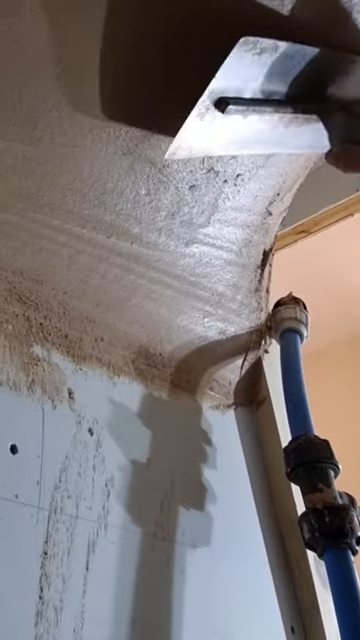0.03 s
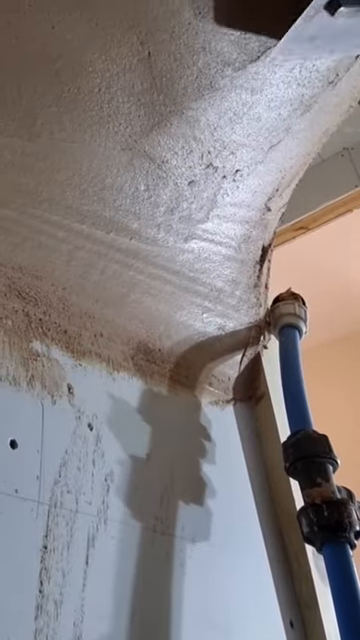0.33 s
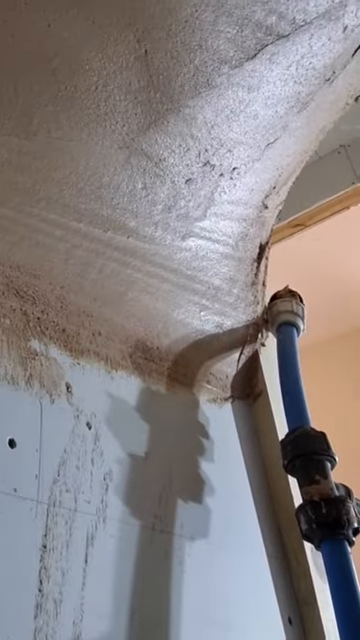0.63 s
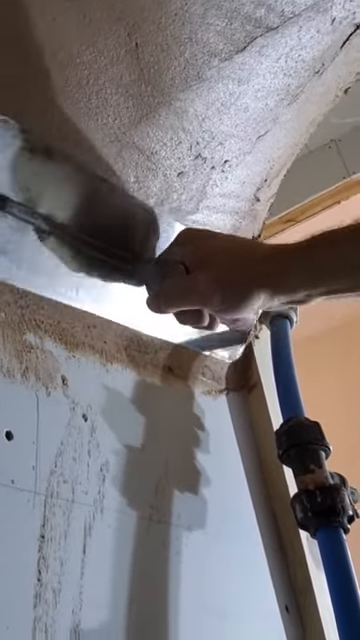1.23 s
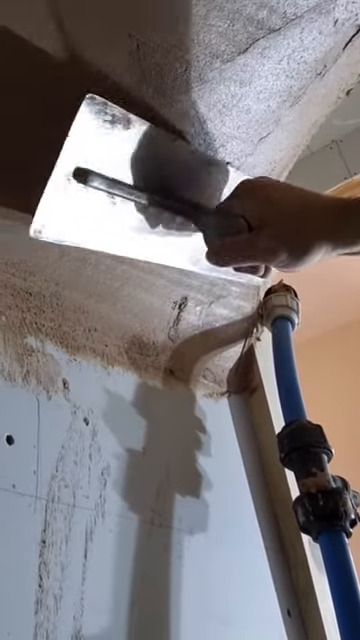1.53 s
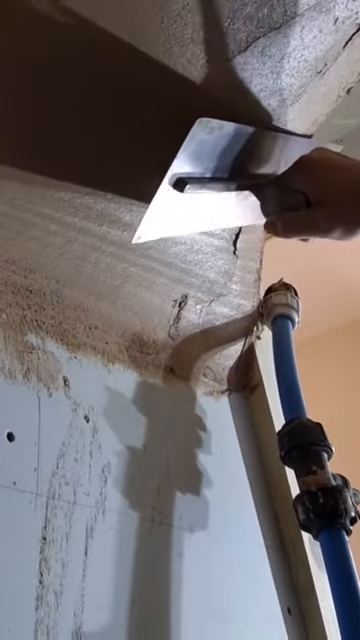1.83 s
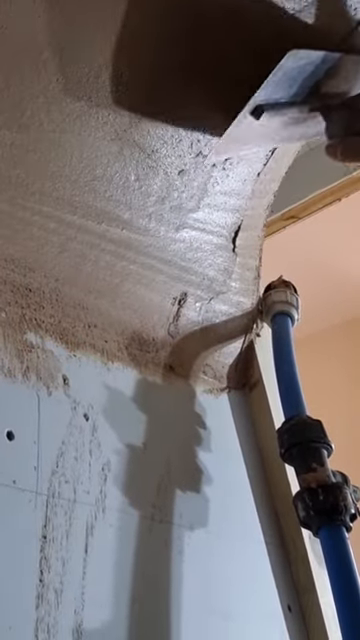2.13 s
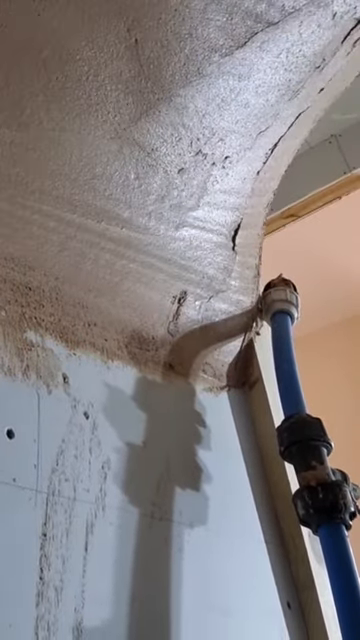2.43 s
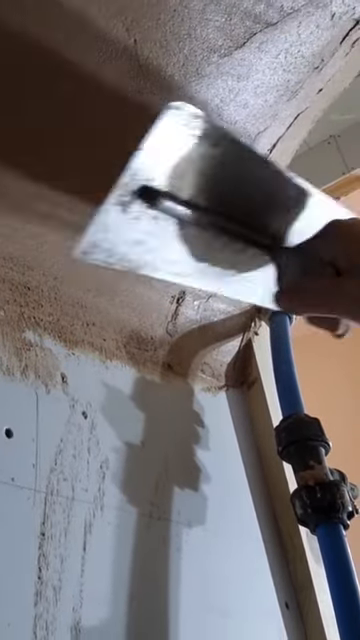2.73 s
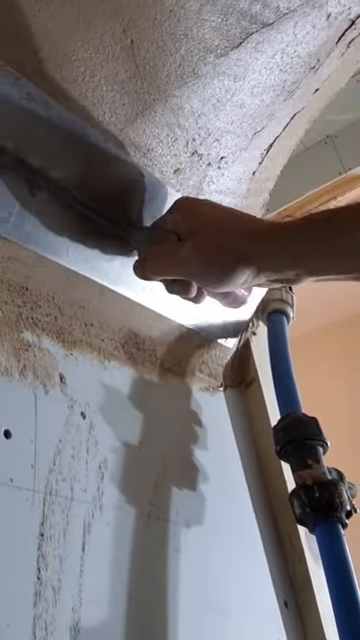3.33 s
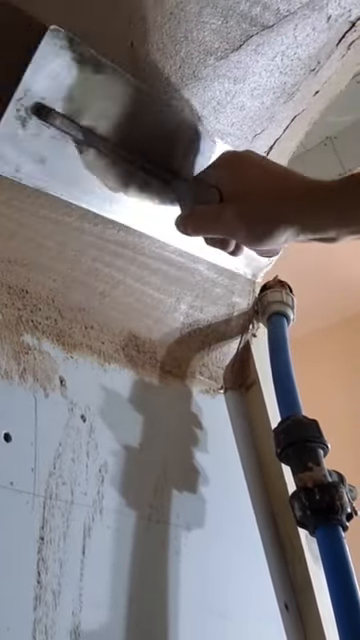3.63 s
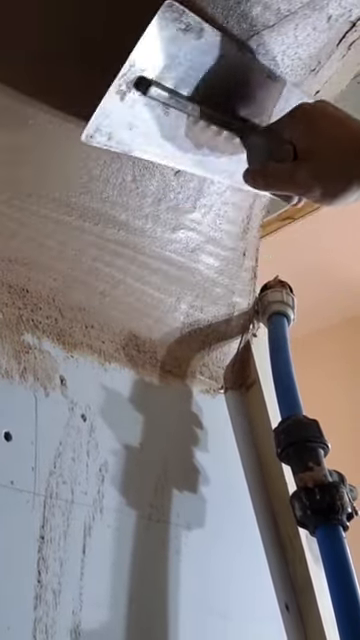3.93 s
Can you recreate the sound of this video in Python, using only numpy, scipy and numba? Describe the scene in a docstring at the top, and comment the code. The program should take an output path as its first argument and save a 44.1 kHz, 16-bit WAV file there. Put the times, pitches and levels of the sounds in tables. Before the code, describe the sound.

A trowel smooths wet plaster close by, with gritty hissing strokes and soft wall thumps.

```python
"""Smoothing plaster with a trowel

A steel trowel works wet plaster, close by in a small bare room. The blade lands with a pat and a soft
thump of the wall board, squashes the plaster, hisses over its sand and flicks off at the stroke's top.
Of three strokes, the first is already under way. Before the last, something like a wet lump slaps down."""
import sys
import numpy as np
from scipy import signal
from scipy.fft import rfft, irfft
from scipy.io import wavfile
from scipy.ndimage import uniform_filter1d
from numba import njit

SR = 44100
rng = np.random.default_rng(int(sys.argv[2]) if len(sys.argv) > 2 else 0)


def to_wav(s):
    """Save 16-bit WAV."""
    ch = np.atleast_2d(s).T  # columns
    pcm = np.round(np.clip(ch, -1, 1) * 32767)  # PCM
    wavfile.write(sys.argv[1], SR, pcm.astype(np.int16))


N = 176400

# How loudly each stroke scrapes: time_s, level_db
FIRST_STROKE = [(0, -61.5), (.06, -58), (.25, -63), (.33, -55.5), (.42, -61), (.5, -57), (.58, -65.5),
                (.597, -103), (.64, -99)]
SECOND_STROKE = [(1.2, -89), (1.233, -56), (1.243, -49), (1.29, -54), (1.34, -52), (1.41, -60), (1.47, -60),
                 (1.55, -58), (1.64, -62.5), (1.76, -63), (1.88, -65), (2.05, -63.5), (2.17, -58.5),
                 (2.36, -56.5), (2.43, -60), (2.5, -58), (2.545, -58.5), (2.585, -102)]
THIRD_STROKE = [(3.15, -79), (3.19, -58), (3.235, -51.5), (3.3, -58.5), (3.42, -59.5), (3.52, -63.5),
                (3.63, -56.5), (3.72, -60), (3.84, -65), (3.94, -60.5), (4, -65.5)]
# How the blade is held: time_s, tilt (0 is flat, 1 is on its edge)
BLADE_TILT = [(0, 0.98), (.58, 0.86), (1.2, 0.074), (1.6, 0.16), (2.0, 0.49), (2.2, 0.91), (2.55, 1),
              (3.15, 0.041), (4, 0.16)]
# Tone of the hiss with the blade flat and on its edge: pitch_hz, level_db
FLAT_TONE = [(300, -20.5), (700, -55), (950, -11.5), (1150, 1), (1430, -9), (1650, -7), (1900, 5),
             (2350, -17.5), (3150, -24), (3650, 0), (4500, -4.5), (5300, -8.5), (6400, -9.5), (7400, -3.5),
             (8600, -16.5), (9900, -24.5), (12500, -13.5), (15500, -17)]
EDGE_TONE = [(300, -16), (700, -30), (1000, -36), (1300, -36), (1600, -16), (2150, -4.5), (3000, -0.5),
             (4400, 1.5), (5700, -3.5), (7400, 2.5), (8600, -8), (9800, -10.5), (12500, -4.5), (15500, -3)]
# Notes the steel rings at: pitch_hz, level_db
STEEL_NOTES = [(1180, -15), (1295, 1), (1420, 0.5), (1615, -3), (1850, -8), (2190, -15), (2860, -11),
               (3880, -9.5), (4450, -8.5)]
# How loudly the blade rings and hums: time_s, level_db
STEEL_LEVEL = [(0, -76.5), (.16, -65), (.24, -69.5), (.32, -66), (.37, -75.5), (.52, -70.5), (.57, -60),
               (.63, -97.5), (1.2, -101), (1.25, -56), (1.35, -58), (1.44, -63), (1.55, -65.5),
               (1.7, -71.5), (1.95, -70.5), (2.2, -67.5), (2.38, -64), (2.55, -64), (2.63, -100),
               (3.15, -92.5), (3.24, -55), (3.35, -65), (3.55, -68.5), (3.68, -69), (3.82, -75.5), (4, -69)]
HUM_LEVEL = [(0, -85.5), (.25, -88.5), (.38, -70.5), (.55, -85), (.66, -92), (1.2, -82), (1.46, -65),
             (1.62, -91.5), (2.14, -91.5), (2.25, -70.5), (2.45, -85), (2.6, -90), (3.3, -70), (3.42, -84),
             (3.75, -93), (4, -95)]
# Tone of the rubbing that feeds the hum: pitch_hz, level_db
HUM_TONE = [(250, -23), (400, 1.5), (470, 1), (700, -29.5)]
# Tone of the background rumble: pitch_hz, level_db
RUMBLE_TONE = [(12, -48), (20, -15.5), (85, 4), (144, -16.5), (185, -35.5), (298, -41.5), (427, -49),
               (519, -46.5), (1230, -42), (1340, -39), (1670, -53), (2330, -45.5), (2540, -47),
               (3640, -46.5), (5850, -55.5), (7110, -53.5), (15500, -59)]
# The edge leaving the wall: time_s, level_db, rise_s, fall_s
FLICKS = [(.575, -70.5, 0.042, 0.033), (2.522, -40, 0.0086, 0.01)]
# Tone of a flick: pitch_hz, level_db
FLICK_TONE = [(300, -31), (680, -9), (850, -17), (1150, 4.5), (1420, 6), (1620, 3), (1900, -10),
              (4000, -7.5), (7500, -10), (9500, -22.5), (12500, -11), (15000, -13.5)]
# Small ticks, mostly coarse grains breaking; the two dull early ones are crumbs of plaster dropping: start_s,
# level_db, hold_s, pitch_hz, snap_strength
TICKS = [(0.601, -74, 0.02, 5240, 0.2), (.934, -65.5, 0.005, 6200, .5),
         (1.378, -59.5, .003, 8750, 0.29), (1.4725, -49.5, 0.0039, 5100, 1.2),
         (1.722, -63.5, 0.016, 7940, 0), (1.923, -56, 0.0052, 10200, 1.4),
         (2.165, -61, 0.0043, 7800, 0), (3.379, -63, 0.0026, 9500, 0),
         (3.777, -56.5, 0.004, 3660, 1.5)]
# The arm swinging back: time_s, level_db, rise_s, fall_s
RUSTLES = [(.74, -82, 0.53, 0.22), (2.72, -74.5, 0.03, 0.025)]
# Tone of a rustle: pitch_hz, level_db
RUSTLE_TONE = [(400, -1), (800, -6), (1300, 3.5), (1800, -9.5), (5400, -13), (6300, -7), (7600, -12),
               (9000, -35)]
# The blade's first wet touch: time_s, level_db, rise_s, fall_s
PATS = [(1.172, -54, 0.0043, 0.0097), (3.114, -41.5, 0.0024, 0.011)]
# Tone of a pat: pitch_hz, level_db
PAT_TONE = [(150, 8.5), (500, -2), (1000, -8), (1500, 4), (2300, -17.5), (4800, -9), (5800, -38),
            (7500, -21), (10000, -42), (15000, -33)]
# The blade landing on the wall: time_s, level_db
THUMPS = [(1.191, -17), (3.149, -11.5)]
# Notes of the wall board: pitch_hz, level_db, fall_s
BOARD_NOTES = [(73.4, 3.5, 0.012), (38, -15.5, 0.0078), (104, -21.5, 0.022), (152, -34.5, 0.019)]
# Plaster squashed early in the second and third strokes: time_s, level_db
SECOND_STROKE_SQUASH = [(1.2, -83), (1.243, -54.5), (1.262, -52), (1.282, -57.5), (1.338, -46.5),
                        (1.398, -72), (1.486, -85), (1.604, -109), (1.62, -106)]
THIRD_STROKE_SQUASH = [(3.16, -64), (3.212, -56.5), (3.242, -42.5), (3.282, -58.5), (3.558, -79.5),
                       (3.624, -73), (3.694, -89), (3.722, -96), (3.75, -108)]
# Tone of the squelching plaster and of the shaking board: pitch_hz, level_db
SQUELCH_TONE = [(150, -2), (200, -13), (260, -9.5), (480, -7), (600, -13.5), (700, -4.5), (830, -1.5),
                (970, 1.5), (1130, -16.5), (1400, -8), (1900, -18), (2600, -22.5), (5000, -49)]
SHUDDER_TONE = [(25, -5.5), (50, 4), (78, 16.5), (105, 4), (140, -51), (220, -53)]
# The slap's two quick hits: start_s, level_db, hold_s
SLAP_HITS = [(2.9068, -36.5, 0.0047), (2.9127, -32.5, 0.005)]
# Tone of the splat: pitch_hz, level_db
SPLAT_TONE = [(60, -23.5), (125, 7.5), (195, -9), (250, -5), (370, -8), (600, -11), (960, -10.5),
              (1150, -10), (1600, -5.5), (1780, -14.5), (2450, -13.5), (3200, -18.5), (4200, -19),
              (7000, -29.5), (9000, -43), (11300, -51.5), (13000, -44), (15500, -43.5)]
# Room notes woken by the slap: pitch_hz, level_db, ring_s (time to fade by 60 dB)
ROOM_NOTES = [(245.3, 9, 0.17), (268.6, -11, .5), (342, -11, 0.88), (398.3, -6, 0.26), (497, -2, 0.38),
              (612, -7.5, 0.38), (760, -5.5, 0.28), (796, -2, 0.19), (1192, 6, .14), (1260, -3.5, 0.19),
              (1406, 4.5, .13), (1605, 4.5, 0.11), (1863, 2, 0.098), (2030, -9, 0.073), (2460, 2, 0.056)]
# Dull notes of the slapped surface: pitch_hz, level_db, fall_s
THUD_NOTES = [(57.6, -35.5, 0.054), (76, -38.5, .025), (98.7, -33, 0.028), (125, -38.5, 0.031)]
# Stereo width, as the side signal's level against the middle's: pitch_hz, level_db
STEREO_WIDTH = [(60, -23.5), (130, -15.5), (260, 2.5), (640, 4.5), (1400, 2.5), (3000, 1), (15000, -1)]
# How much louder the left is than the right: pitch_hz, level_db
LEFT_BOOST = [(100, 2.33), (220, 8.9), (550, 2), (900, 6.5), (1650, 0.25), (2400, 6.2), (3400, 2),
              (4600, 7.1), (6200, 1.5), (7900, 8.1), (9700, 0.5), (12500, 8.1)]

TIME_S = np.arange(N) / SR


def amp(db):
    """Turn decibels into a number to multiply by."""
    return 10 ** (np.asarray(db) / 20)


def unit(x):
    """Scale a signal to an average strength (rms) of 1."""
    return x / np.sqrt(np.mean(x ** 2))


def colour(x, tone):
    """Make each pitch louder or softer, following a tone table."""
    hz, db = np.array(tone, float).T
    pitches = np.maximum(np.arange(N // 2 + 1) * SR / N, 1)
    return irfft(rfft(x) * amp(np.interp(np.log(pitches), np.log(hz), db)), N)


def loudness(points):
    """Join (time_s, level_db) points into a curve that fades quickly beyond its ends."""
    times, db = np.array(points, float).T
    outside_s = np.maximum(np.maximum(times[0] - TIME_S, TIME_S - times[-1]), 0)
    return amp(np.interp(TIME_S, times, db)) * np.exp(-(outside_s / .02) ** 2)


def wander(per_s, size=20000):
    """A curve of strength 1 that glides to a new random value per_s times a second."""
    return unit(np.interp(TIME_S * per_s, np.arange(size), rng.standard_normal(size)))


def spread(pair):
    """Make left and right from a middle and a side signal."""
    side = colour(pair[1], STEREO_WIDTH)
    return np.array([pair[0] + side, pair[0] - side])


def noise(tone, roughness=1):
    """Stereo noise with the given tone; a roughness curve makes it grainy."""
    return spread(unit(colour(rng.standard_normal((2, N)) * roughness, tone)))


def swell(time_s, rise_s, fall_s):
    """A curve that grows toward a moment and dies away after it."""
    t = TIME_S - time_s
    return np.exp(-np.logaddexp(-t / rise_s, t / fall_s))


def swells(rows):
    """Add a table of swells into one loudness curve."""
    return sum(amp(db) * swell(time_s, rise_s, fall_s) for time_s, db, rise_s, fall_s in rows)


def hit(start_s, hold_s, fall_s, rise_s=0.0016):
    """A curve that jumps up, holds and dies away."""
    t = TIME_S - start_s
    return np.clip(t / rise_s, 0, 1) * np.exp(-np.maximum(t - hold_s, 0) / fall_s)


@njit
def resonate(x, hz, width):
    """Let through a narrow band around a pitch that may move; width is a share of that pitch."""
    out, band, low = np.empty(len(x)), 0., 0.
    for i in range(len(x)):
        tuning = np.tan(np.pi * hz[i] / SR)
        swing = (band + tuning * (x[i] - low)) / (1 + tuning * (tuning + width))
        band = 2 * swing - band
        low = low + 2 * tuning * swing
        out[i] = width * swing
    return out


def sand(grain_db=0.5, flutter_db=2):
    """The uneven push of sand grains catching under the blade, plus the flutter of the hand."""
    return amp(grain_db * wander(per_s=2800) + flutter_db * wander(per_s=70))


def shifting_contact(hiss, depth_db=2.6):
    """The line where the blade touches keeps changing, so narrow bands of hiss swell and fade."""
    _, _, bands = signal.stft(hiss, nperseg=1024)
    patches = rng.standard_normal(bands.shape[1:])
    for _ in range(2):
        patches = uniform_filter1d(patches, size=4, axis=0)  # blur across pitch
        patches = uniform_filter1d(patches, size=7, axis=1)  # blur across time
    return signal.istft(bands * amp(depth_db * unit(patches)), nperseg=1024)[1][:, :N]


def scrape():
    """Sand hisses under the blade, brighter as it tilts onto its edge; the steel rings and hums."""
    force = loudness(FIRST_STROKE) + loudness(SECOND_STROKE) + loudness(THIRD_STROKE)
    tilt = np.interp(TIME_S, *np.array(BLADE_TILT).T)
    grains = sand()
    flat = amp(-7.5) * np.sqrt(1 - tilt) * noise(FLAT_TONE, grains)
    edge = amp(-3.5) * np.sqrt(tilt) * noise(EDGE_TONE, grains)
    hum = blade_hum()
    hiss = force * shifting_contact(flat + edge)
    return hiss + loudness(STEEL_LEVEL) * steel_ring(grains) + hum


def blade_hum(pitch_hz=427., width_hz=50):
    """Rubbing makes the blade hum faintly on one low note."""
    pitch = np.full(N, pitch_hz)
    pair = np.array([resonate(rub, pitch, width_hz / pitch_hz) for rub in noise(HUM_TONE)])
    return loudness(HUM_LEVEL) * unit(pair)


def steel_ring(grains, catch_db=3, waver_db=4, drift_share=.022):
    """The blade catches and slips, so it rings; its notes drift and waver as the pressure shifts."""
    catching = grains * amp(catch_db * wander(per_s=130))
    ring = 0
    for hz, db in STEEL_NOTES:
        pitch = hz * (1 + drift_share * wander(per_s=10))
        pushes = rng.standard_normal((2, N)) * catching
        note = np.array([resonate(push, pitch, width=0.019) for push in pushes])
        ring += amp(db + waver_db * wander(per_s=18)) * unit(note)
    return spread(unit(ring))


def rumble():
    """A low, steady rumble lies behind everything."""
    return amp(-64) * noise(RUMBLE_TONE)


def flicks(ring_db=-27):
    """The edge speeds off the wall with a short rasp that rings the steel."""
    grains = sand()
    return swells(FLICKS) * (noise(FLICK_TONE, grains) + amp(ring_db) * steel_ring(grains))


def ticks(snap_s=0.00027, fall_s=0.0034):
    """Coarse grains snap and crumble for a moment, and a few crumbs of plaster drop; bigger ones sound lower."""
    cracks, grains = 0, sand()
    for start_s, db, hold_s, hz, strength in TICKS:
        t = TIME_S - start_s
        snap = strength * (t >= 0) * np.exp(-np.abs(t) / snap_s)
        crunch = noise([(hz / 16, -56), (hz / 4, -28), (hz, 0), (hz * 4, -28)], grains)
        cracks += amp(db) * (snap + hit(start_s, hold_s, fall_s)) * crunch
    return cracks


def arm_rustle():
    """The arm swings back with a faint rustle."""
    return swells(RUSTLES) * noise(RUSTLE_TONE)


def landings(rise_s=0.0074):
    """The blade lands with a wet pat, then its cushioned push sets the wall board swinging."""
    pat = swells(PATS) * noise(PAT_TONE, sand())
    thump = 0
    for time_s, db in THUMPS:
        for hz, note_db, fall_s in BOARD_NOTES:
            note = np.sin(2 * np.pi * hz * (TIME_S - time_s))
            thump += amp(db + note_db) * swell(time_s, rise_s, fall_s) * note
    return pat + thump


def squash():
    """Thick plaster squelches under the freshly landed blade, whose drag shakes the board."""
    force = loudness(SECOND_STROKE_SQUASH) + loudness(THIRD_STROKE_SQUASH)
    squelch = amp(-1) * noise(SQUELCH_TONE, sand())
    shudder = amp(8.5) * noise(SHUDDER_TONE)
    return force * (squelch + shudder)


def slap(thud_start_s=2.916):
    """Something wet splats down; the room rings and the struck surface gives a low thud."""
    hits = sum(amp(db) * hit(start_s, hold_s, fall_s=0.0079) for start_s, db, hold_s in SLAP_HITS)
    splat = hits * noise(SPLAT_TONE, sand())
    thud = 0
    for hz, db, fall_s in THUD_NOTES:
        note = np.sin(2 * np.pi * hz * (TIME_S - thud_start_s))
        thud += amp(db) * hit(thud_start_s, 0, fall_s) * note
    return splat + room_ring(start_s=SLAP_HITS[-1][0]) + thud


def room_ring(start_s, wander_cycles=0.16, waver_db=3):
    """The slap wakes the room's own notes, which waver as they fade."""
    ring = 0
    for hz, db, ring_s in ROOM_NOTES:
        cycles = hz * TIME_S + rng.random((2, 1)) + wander_cycles * wander(per_s=60)
        level = amp(db + waver_db * wander(per_s=50))
        fade = hit(start_s, 0, fall_s=ring_s / np.log(1000))
        ring += level * fade * np.sin(2 * np.pi * cycles)
    return amp(-45.5) * spread(ring)


def room_echo(dry, echo_db=-19, low_fade_s=0.19, high_fade_s=0.1):
    """Bare walls add a short wash of echoes; the high pitches die first."""
    low = noise([(80, -26), (250, -1.0), (1400, -4.5), (2800, -28.5)])
    high = amp(15) * noise([(1000, -32.5), (2500, 4.5), (7000, 5), (15000, -0.5)])
    echo = low * amp(-60 * TIME_S / low_fade_s) + high * amp(-60 * TIME_S / high_fade_s)
    echo *= np.clip(TIME_S / 0.014, 0, 1)  # echoes take a moment to build up
    echo /= np.sqrt(np.sum(echo ** 2) / 2)
    return dry + amp(echo_db) * signal.fftconvolve(dry, echo, axes=1)[:, :N]


def scene():
    """All the sounds in the room, over the rumble and louder on the left."""
    work = scrape() + squash() + landings() + ticks() + slap() + flicks() + arm_rustle()
    left, right = room_echo(work) + rumble()
    left = colour(left, [(hz, db / 2) for hz, db in LEFT_BOOST])
    right = colour(right, [(hz, -db / 2) for hz, db in LEFT_BOOST])
    return np.array([left, right])


def record(dry):
    """The recorder cuts off the very highest pitches."""
    top_hz = 15650
    return signal.sosfilt(signal.ellip(10, .2, 80, top_hz, fs=SR, output="sos"), dry)


dry = scene()
out = record(dry)
to_wav(out)
```